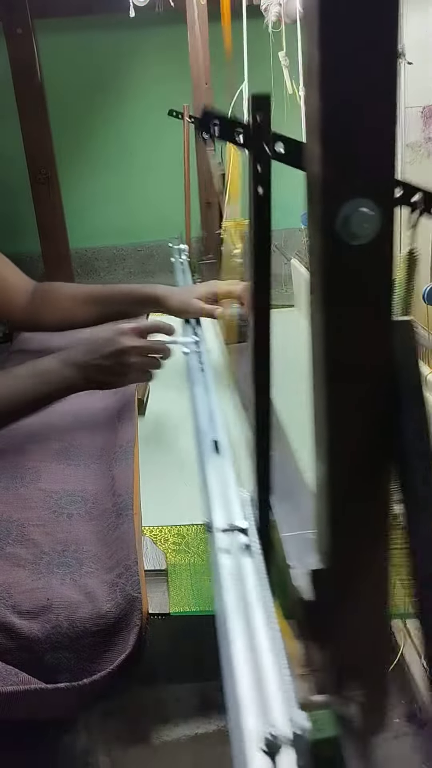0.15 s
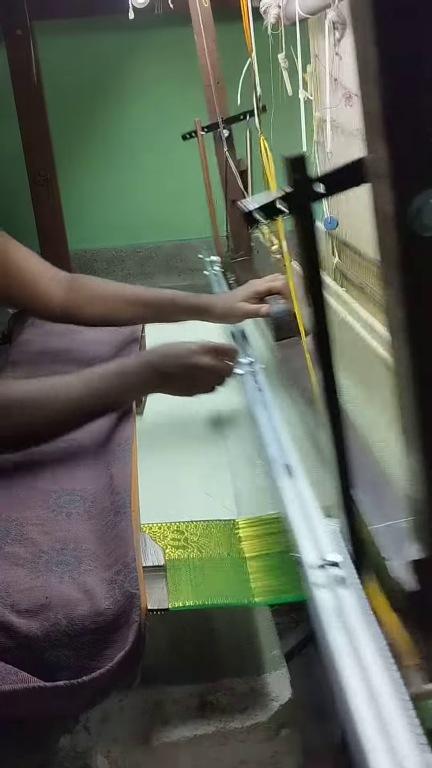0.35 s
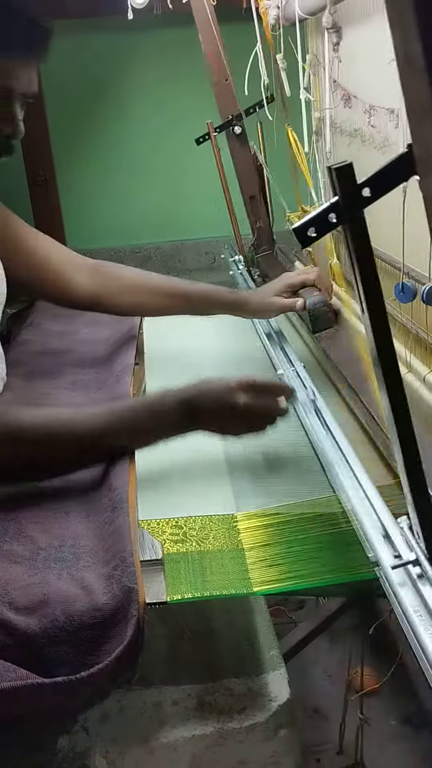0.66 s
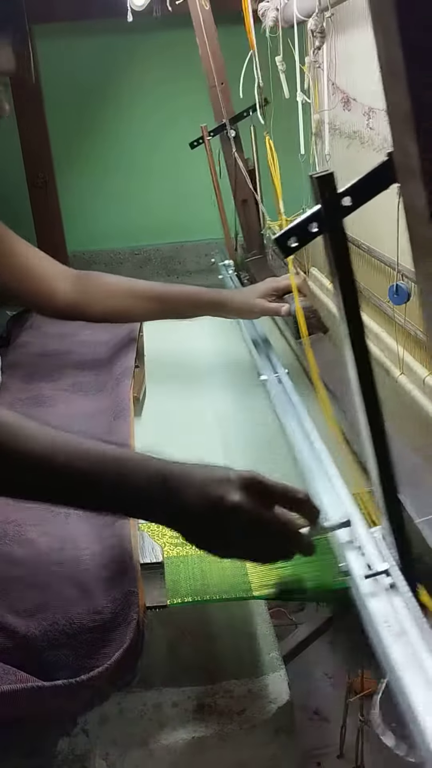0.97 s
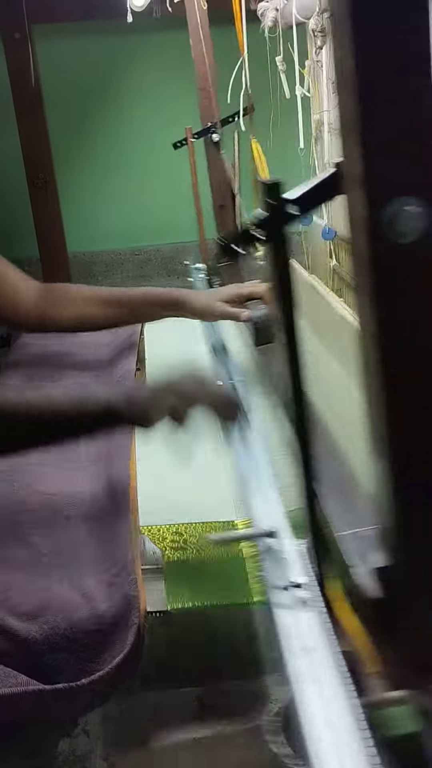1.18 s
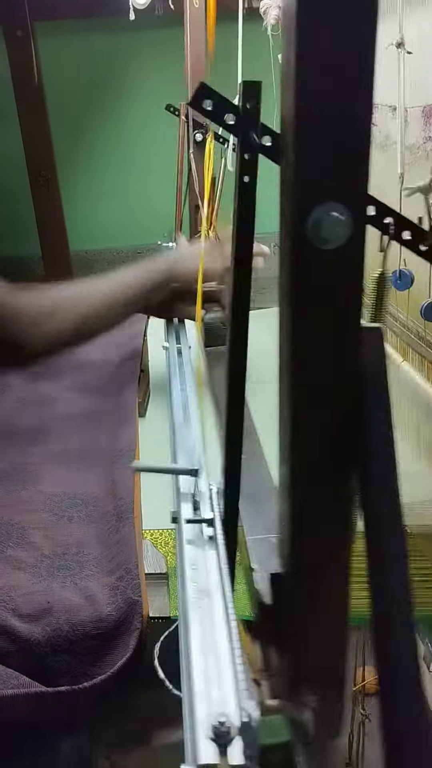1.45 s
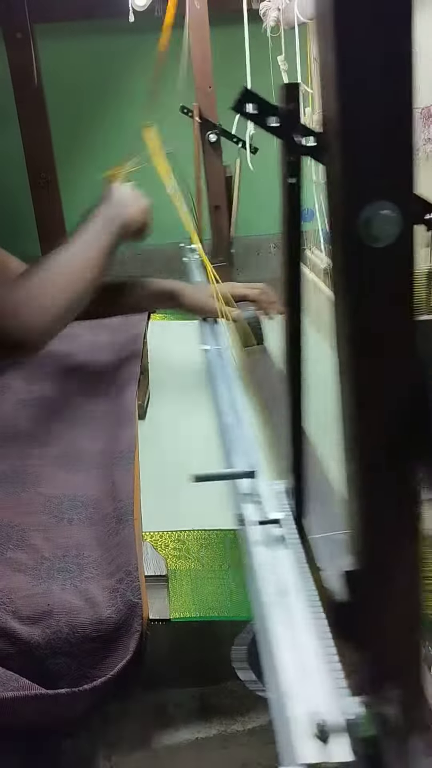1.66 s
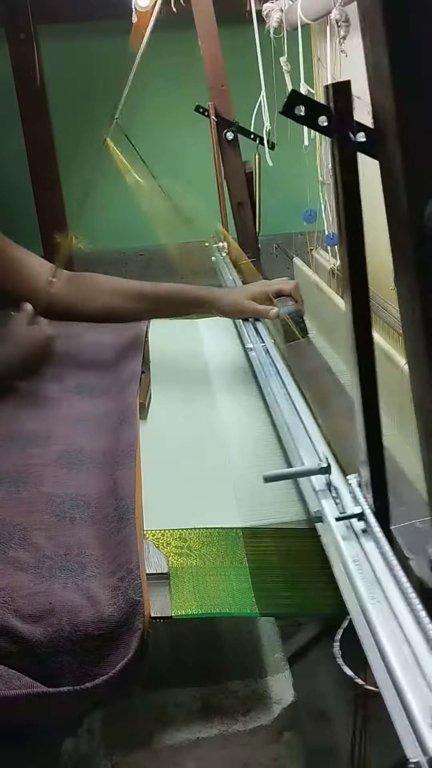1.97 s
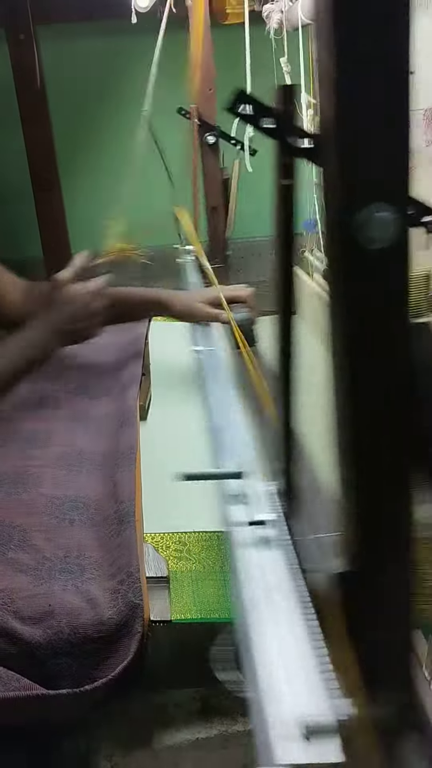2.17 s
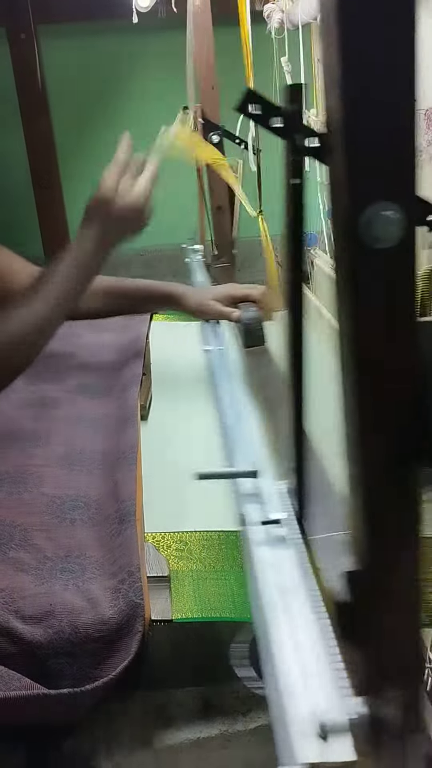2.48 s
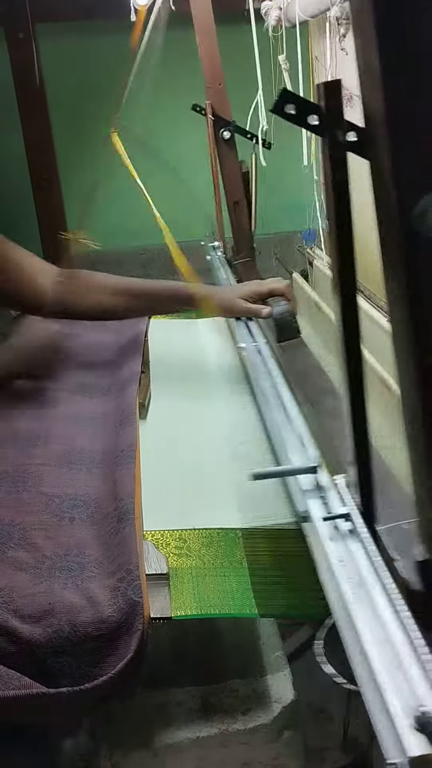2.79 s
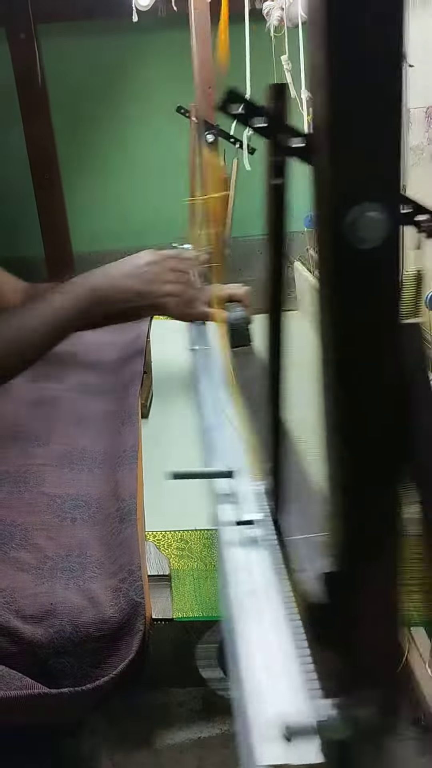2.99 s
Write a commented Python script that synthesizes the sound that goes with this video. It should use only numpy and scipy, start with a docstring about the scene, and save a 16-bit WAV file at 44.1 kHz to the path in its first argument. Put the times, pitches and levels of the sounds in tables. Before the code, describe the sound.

A wooden handloom close up in a small hard room: rattling beater and rustling threads, a short shuttle roll ending in a sharp clack, then heavy knocks and lever clicks over low frame booms; stereo, faint room rumble.

```python
"""Handloom in a small room

A wooden handloom is worked in a small hard-walled room. Its beater, shuttle, picker and levers are bursts of
tiny contacts that ring wooden modes. Jolts set off decaying low sines for the boom of the frame and the room.
Heddles and threads are bright brushed noise, the shuttle's roll is contact noise under a level curve, and
shaped noise makes the rumble and hiss of the room."""
import sys
import numpy as np
from scipy import signal
from scipy.fft import rfft, irfft, next_fast_len
from scipy.io import wavfile

SR = 44100
rng = np.random.default_rng(int(sys.argv[2]) if len(sys.argv) > 2 else 0)


def pcm_store(signal):
    """Save signal as 16-bit PCM."""
    levels = np.round(np.clip(np.atleast_2d(signal), -1, 1) * 32767)
    wavfile.write(sys.argv[1], SR, levels.astype(np.int16).T)


N = 138033  # length in samples

# Levels in the tables are those ahead of the microphone colour.
# Frequency bands that colour each blow: low_hz, high_hz
BLOW_BANDS = [(130, 550), (700, 1600), (1600, 3200), (3200, 7500), (11500, 16000)]
# Beater shaking the frame: start_s, rise_s, rattle_t60_s, then level_db in each of the five bands
BEATER_BLOWS = [(0.0, 0.0067, 0.52, -26.5, -28.5, -26, -25.5, -36),
                (.365, 0.029, 0.23, -23.5, -26.5, -30.5, -24.5, -30),
                (.49, 0.027, 0.3, -27, -33.5, -31.5, -29, -39),
                (1.385, .115, 0.27, -23, -23, -23.5, -21, -31),
                (1.533, 0.0017, 0.058, -45, -17, -12.5, -37, -36),
                (2.335, 0.0055, 0.057, -14.5, -25.5, -25, -24, -32),
                (2.344, 0.01, 0.13, -38, -17.5, -16, -17, -28),
                (2.36, .012, 0.19, -28.5, -18.5, -16, -21, -34),
                (2.408, .003, .08, -37, -18, -19.5, -24, -45), (2.66, 0.005, 0.12, -24, -30, -34, -40, -50)]
# Shuttle landing in its box: start_s, rise_s, rattle_t60_s, then level_db in each of the five bands
BOX_LANDINGS = [(1.793, .002, 0.2, -56, -30.5, -35, -41, -54),
                (1.86, 0.024, 0.078, -37, -26.5, -31, -37.5, -49),
                (1.8835, 0.0012, 0.11, -21.5, -17.5, -18, -23.5, -40.5),
                (1.9, 0.0066, 0.25, -46, -28.5, -24.5, -23.5, -39),
                (2.848, .006, 0.18, -42, -30, -49, -55, -55.5),
                (2.878, 0.00061, 0.16, -28.5, -20.5, -16.5, -12.5, -28.5),
                (2.975, .01, 0.22, -48, -32, -30.5, -25.5, -49)]
# Shuttle running against the picker: start_s, rise_s, rattle_t60_s, then level_db in each of the five bands
PICKER_CATCHES = [(.175, 0.0023, 0.054, -62, -19, -21.5, -34, -46),
                  (1.0195, 0.0009, .038, -30.5, -12, -5, -17, -40)]
# Picker and levers clicking: start_s, rise_s, rattle_t60_s, then level_db in each of the five bands
LEVER_CLICKS = [(2.123, 0.0011, 0.031, -22.5, -18.5, -11.5, -8.5, -24),
                (2.247, 0.0065, 0.14, -27.5, -21.5, -31, -26, -46),
                (2.26, 0.0026, 0.045, -34, -31, -17, -10.5, -28),
                (2.597, 0.0087, 0.2, -30, -27.5, -31.5, -30, -47),
                (2.618, 0.0026, 0.043, -27, -25.5, -43, -33, -38),
                (2.662, 0.0024, 0.023, -17.5, -22.5, -16.5, -14.5, -29.5),
                (2.679, .001, 0.034, -27, -19.5, -17.5, -16, -39),
                (2.72, 0.00073, 0.018, -48, -24, -16, -15, -38)]
# Heddles and threads shifting: start_s, rise_s, fade_t60_s, mid_db (brush reference), top_db (at 12.5 kHz)
HEDDLE_RUSTLES = [(0.127, 0.008, 0.26, -20.5, -19.5), (0.221, 0.032, 0.58, -30, -38),
                  (.298, 0.011, 0.9, -26, -31.5), (.376, 0.026, 0.073, -12.5, -16.5),
                  (0.473, 0.0041, 0.059, -18, -17.5), (0.491, 0.01, 0.042, -17.5, -15),
                  (0.614, 0.004, 0.66, -26.5, -27), (0.693, 0.0073, 0.07, -22, -26),
                  (0.836, 0.0027, 0.24, -30, -25), (0.938, .006, 0.12, -32, -27.5),
                  (1.02, 0.0036, 0.14, -42, -30.5), (1.068, .004, 0.18, -26.5, -31.5),
                  (1.193, 0.0027, 0.61, -28.5, -35.5), (1.279, 0.028, 0.7, -26.5, -34),
                  (1.375, .005, 0.1, -16, -26), (1.39, 0.027, 0.32, -18, -19),
                  (1.469, 0.028, 0.49, -21, -26), (2.042, 0.01, 0.22, -37, -41),
                  (2.145, 0.014, 1, -28, -49), (2.715, 0.013, 0.28, -43, -38),
                  (2.798, 0.011, 0.16, -46, -33.5)]
# Colour of a rustle below its bright top: frequency_hz, level_db (relative to mid_db)
BRUSH_COLOUR = [(100, 8), (1500, -3), (4000, 1.5), (6500, 0)]
# Swell and fade of the shuttle rolling over the warp: time_s, level_db
ROLL_LEVEL = [(0.582, -42), (0.631, -30.5), (.7, -23.5), (.76, -20.5), (.83, -21), (.92, -24.5),
              (1.01, -29), (1.03, -50)]
# Colour of the roll, relative since it is scaled to rms 1: frequency_hz, level_db
ROLL_TONE = [(120, -52), (200, -32), (240, -14), (433, -14.5), (461, -11), (569, -10), (1250, 1.5),
             (2670, -6.5), (5710, -19), (6440, -13.5), (7500, -28), (9750, -63), (16500, -120)]
# Modes of the frame, the box and the picker, before the blow's colour: pitch_hz, level_db (relative), t60_s
FRAME_MODES = [(1066, 1.5, .45), (1261, -1.5, 0.27), (1256, -26.5, 0.33), (1547, -5.5, 1),
               (1654, -15, 0.21), (1846, 1, 0.15), (2530, 3, 0.1), (3060, -13, 0.27), (260.3, 1, 0.31),
               (225.6, -13.5, 0.92)]
BOX_MODES = [(910, -1.5, 0.16), (1067, -6.5, .2), (1940, -7, .15), (2476, -4.5, 0.28), (2850, 4, 0.07),
             (2930, 1.5, 0.24)]
PICKER_MODES = [(994, -0.5, 0.48), (1540, -2, 0.15), (1660, 1, 0.18), (2003, -17, 0.12), (2295, -6, 0.38),
                (2505, -2, 0.57), (2724, 2.5, 0.043)]
# Low modes of the frame, and one of the room near 158 Hz: pitch_hz, level_db (relative), t60_s
BOOM_MODES = [(56.2, -3, 1), (76, -2, 1.36), (85.4, -13, 2.7), (99.7, -4, 1.95), (157.8, -0.5, 1.45)]
# Jolts that set the frame booming: start_s, level_db, favoured_hz
FRAME_JOLTS = [(0.0, -27.5, 83), (0.199, -26, 57), (0.412, -29.5, 158), (0.499, -38.5, 99),
               (1.022, -33, 56), (1.449, -25.5, 60), (1.53, -26, 89.6), (1.8, -30, 57), (1.889, -33.5, 101),
               (2.337, -19.5, 74), (2.39, -33.5, 157), (2.599, -33, 56.3)]
# Colours of the room's rumble and hiss, relative since each is scaled to rms 1: frequency_hz, level_db
RUMBLE_COLOUR = [(12, -33), (20, -1.5), (86, 0), (145, -5.5), (187, 3), (258, 0.5), (300, 0), (387, -2.5),
                 (500, -2.5), (650, -11), (1100, -120)]
HISS_COLOUR = [(290, -49), (500, 9), (1440, 5), (2040, 2), (7100, -11), (7750, -3.5), (16000, -46)]
# Reverberation time of the room: frequency_hz, t60_s
ROOM_DECAY = [(100, 0.85), (400, 0.76), (1200, 0.49), (3000, 0.52), (6000, 0.39), (13000, 0.31)]
# Likeness of the two channels: frequency_hz, correlation (1 = the same, 0 = unrelated)
STEREO_LIKENESS = [(30, 0.72), (70, 0.83), (170, 1), (350, 0.67), (700, 0.51), (1400, 0), (10000, 0.041)]
# Microphone colour shared by both channels: frequency_hz, gain_db
MIC_COLOUR = [(30, -0.5), (300, -1.5), (400, -1.5), (550, -6), (780, 0), (1000, 1.5), (3000, 3),
              (3600, 1.5), (6400, 4), (7400, 0), (8300, -9.5), (9800, 0), (11200, -4), (12800, 7.5),
              (15600, 6.5)]
# Stereo balance, first channel over second: frequency_hz, difference_db
STEREO_LEAN = [(60, 1.5), (250, -1.5), (550, 3.5), (1200, -1), (2400, 0.5), (4400, -1.5), (7000, -5.5),
               (9500, 3.5), (12000, 6.5), (15000, -2)]

RUMBLE_DB, HISS_DB = -39, -40  # rms levels ahead of the microphone colour
CONTACT_S = 0.0059  # time in which one tiny contact fades to 1/e in amplitude
LINE_WIDTH_HZ = 12.7  # blur of each ringing mode
JOLT_OCTAVES = 0.21  # spread of a jolt around its favoured frequency
CEILING = 1  # full-scale level that rounded peaks approach
TOP_HZ = 15800  # upper band limit


def amp(db):
    """Decibels to gain."""
    return 10 ** (np.asarray(db) / 20)


def unit(x):
    """Scale to rms 1."""
    return x / np.sqrt(np.mean(x ** 2) + 1e-20)


def along(points, hz):
    """Read a curve of (frequency, value) points on a log frequency axis."""
    f, v = np.transpose(points)
    return np.interp(np.log(hz + 1), np.log(f + 1), v)


def dying(t, t60):
    """Exponential decay that falls 60 dB in t60 seconds."""
    return np.exp(-np.log(1000) * np.maximum(t, 0) / np.maximum(t60, 1e-3))


def filtered(x, gain):
    """Shape the spectrum of x with a gain that depends on frequency."""
    n = x.shape[-1]
    m = next_fast_len(n + SR // 4)
    spectrum = rfft(x, m) * gain(np.fft.rfftfreq(m, 1 / SR))
    return irfft(spectrum, m)[..., :n]


def add(out, start_s, x):
    """Mix x into out from start_s."""
    i = max(round(start_s * SR), 0)
    out[:, i:i + x.shape[1]] += x[:, :N - i]


def chatter(size, rate, rough):
    """Random tiny contacts, rate a second, carried by noise; rough is their share against smooth rubbing."""
    knocks = (rng.random(size) < rate / SR) * rng.exponential(1, size)
    power = signal.lfilter([1], [1, -np.exp(-2 / (CONTACT_S * SR))], knocks)
    share = np.clip(rough, 0, 1)
    envelope = np.sqrt(1 - share + share * power / (power.mean() + 1e-12))
    return envelope * rng.standard_normal((2, size))


def burst(rise_s, t60_s, rate, rough):
    """One second of contacts that build up linearly and then die away."""
    t = np.arange(SR) / SR
    build_up = np.minimum(t / max(rise_s, 1e-4), 1)
    return chatter(SR, rate, rough) * build_up * dying(t - rise_s, t60_s)


def ringing(x, modes, ring_db):
    """Modes store the energy of the contacts and give it off, each wavering a little in phase."""
    power, out = np.mean(x ** 2, axis=0), np.zeros(x.shape)
    t = np.arange(x.shape[1]) / SR
    for pitch_hz, level_db, t60_s in modes:
        keep = dying(2 / SR, t60_s)  # energy left after one sample
        stored = signal.lfilter([1 - keep], [1, -keep], power)
        drift = np.cumsum(rng.standard_normal(len(t))) * np.sqrt(2 * np.pi * LINE_WIDTH_HZ / SR)
        start_phase = rng.random((2, 1))  # in turns, one for each channel
        tone = np.sin(2 * np.pi * (pitch_hz * t + start_phase) + drift)
        out += amp(level_db) * np.sqrt(stored) * tone
    return amp(ring_db) * out


def room(x, wet_db):
    """Direct sound and a decaying noise tail for the walls, balanced to keep the total power."""
    hz, t, grains = signal.stft(rng.standard_normal((2, SR)), SR, nperseg=256)
    t60_s = along(ROOM_DECAY, hz)[:, None]
    swell = 1 - dying(t, 0.035)
    tail = signal.istft(grains * dying(t, t60_s) * swell, SR, nperseg=256)[1]
    wet = signal.fftconvolve(x, tail / np.linalg.norm(tail[0]), axes=1)[:, :x.shape[1]]
    return (x + amp(wet_db) * wet) / np.hypot(1, amp(wet_db))


def blows(rows, modes, ring_db, wet_db, rate, rough):
    """Each blow is a burst of contacts with its own colour that rings the part struck."""
    out = np.zeros((2, N))
    low_hz, high_hz = np.transpose(BLOW_BANDS)
    centre_hz = np.sqrt(low_hz * high_hz)
    width_db = 10 * np.log10((high_hz - low_hz) / (SR / 2))
    for start_s, rise_s, t60_s, *band_db in rows:
        density_db = np.array(band_db) - width_db  # band level to spectrum level
        bass = [(20, density_db[0] - 11), (120, density_db[0] - 5)]
        colour = [*bass, *zip(centre_hz, density_db)]
        hit = burst(rise_s, t60_s, rate, rough)
        sound = room(hit, wet_db) + ringing(hit, modes, ring_db)
        add(out, start_s, filtered(sound, lambda hz: amp(along(colour, hz))))
    return out


def coloured_noise(colour):
    """Steady stereo noise with the given colour, at rms 1."""
    noise = rng.standard_normal((2, N))
    return unit(filtered(noise, lambda hz: amp(along(colour, hz))))


def background():
    """Low rumble and faint hiss of the room, as steady shaped noise."""
    return amp(RUMBLE_DB) * coloured_noise(RUMBLE_COLOUR) + amp(HISS_DB) * coloured_noise(HISS_COLOUR)


def beater():
    """The beater rattles the frame: contact bursts feed the frame's modes."""
    return blows(BEATER_BLOWS, FRAME_MODES, ring_db=-20.5, wet_db=-5, rate=220, rough=0.56)


def boom():
    """Low modes of the frame and room sound and fade after each jolt, strongest near the frequency it favours."""
    out, t = np.zeros((2, N)), np.arange(2 * SR) / SR
    onset = 1 - dying(t, 0.028)
    for start_s, jolt_db, favoured_hz in FRAME_JOLTS:
        ring = np.zeros(len(t))
        for pitch_hz, level_db, t60_s in BOOM_MODES:
            octaves_off = np.log2(pitch_hz / favoured_hz)
            favour = np.exp(-.5 * (octaves_off / JOLT_OCTAVES) ** 2)
            ring += amp(level_db) * favour * dying(t, t60_s) * np.sin(2 * np.pi * pitch_hz * t)
        # only the first of the two signals, which becomes the middle of the stereo image
        add(out, start_s, amp(jolt_db) * np.outer([1, 0], ring * onset))
    return out


def heddles():
    """Fine wires and threads brush each other: bursts of mostly smooth rubbing, coloured one by one."""
    out = np.zeros((2, N))
    for start_s, rise_s, t60_s, mid_db, top_db in HEDDLE_RUSTLES:
        colour = [(hz, mid_db + db) for hz, db in BRUSH_COLOUR] + [(12500, top_db)]
        contacts = burst(rise_s, t60_s, rate=570, rough=0.19)
        brush = filtered(contacts, lambda hz: amp(along(colour, hz)))
        add(out, start_s, room(brush, wet_db=-2))
    return out


def shuttle():
    """Rolling contacts ring the frame; bursts ring the picker on meeting it and the box on landing."""
    time_s, level_db = np.transpose(ROLL_LEVEL)
    level = amp(np.interp(np.arange(N) / SR, time_s, level_db, left=-120, right=-120))
    wheels = level * chatter(N, rate=220, rough=0.4)
    rolling = room(wheels, wet_db=-3.5) + ringing(wheels, FRAME_MODES, ring_db=-24)
    roll = filtered(rolling, lambda hz: unit(amp(along(ROLL_TONE, hz))))
    catches = blows(PICKER_CATCHES, PICKER_MODES, ring_db=-15, wet_db=-3, rate=1200, rough=0.2)
    landings = blows(BOX_LANDINGS, BOX_MODES, ring_db=-15, wet_db=-2.5, rate=590, rough=0.41)
    return roll + catches + landings


def levers():
    """Picker and levers click: short contact bursts feed the frame's modes."""
    return blows(LEVER_CLICKS, FRAME_MODES, ring_db=-22, wet_db=-4.5, rate=510, rough=0.63)


def scene():
    """Loom and room in stereo: mid and side are weighted so the channels are most alike in the bass."""
    loom = beater() + boom() + shuttle() + levers() + heddles()

    def mid_side_gain(hz):
        angle = np.arccos(np.clip(along(STEREO_LIKENESS, hz), -1, 1)) / 2
        return np.array([np.cos(angle), np.sin(angle)])

    mid, side = filtered(loom + background(), mid_side_gain)
    return np.array([mid + side, mid - side])


def record(dry):
    """Microphone colour and balance, rounded peaks, then a band limit."""
    halves = np.array([[0.5], [-0.5]])  # the lean is split between the two channels
    x = filtered(dry, lambda hz: amp(along(MIC_COLOUR, hz) + halves * along(STEREO_LEAN, hz)))
    rounded = x / (1 + (x / CEILING) ** 4) ** 0.25
    return filtered(rounded, lambda hz: hz < TOP_HZ)


dry = scene()
out = record(dry)
pcm_store(out)
```